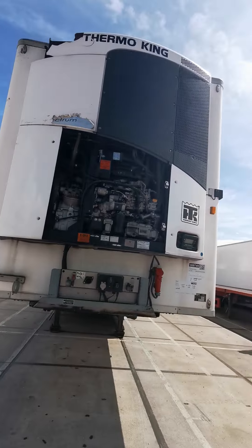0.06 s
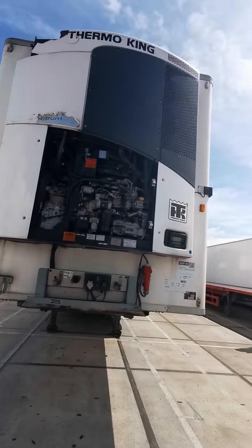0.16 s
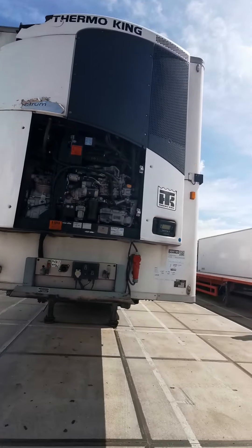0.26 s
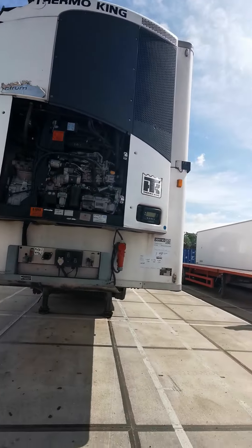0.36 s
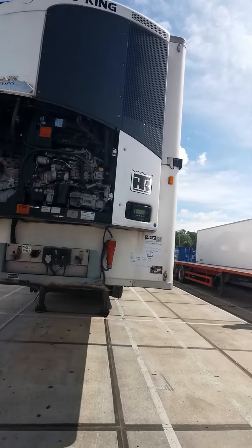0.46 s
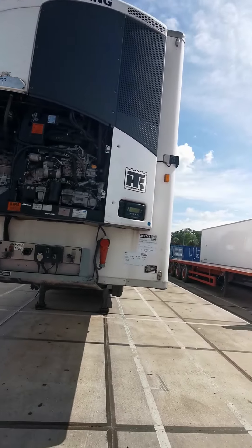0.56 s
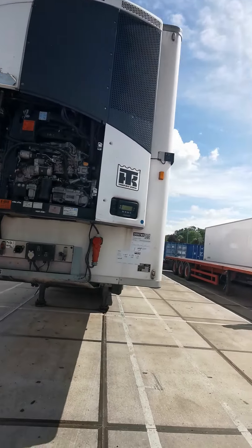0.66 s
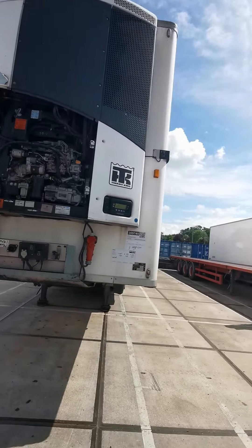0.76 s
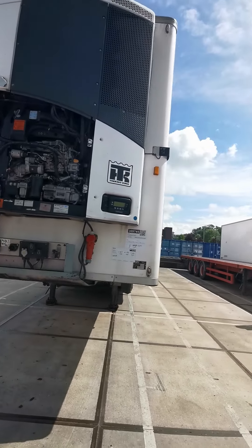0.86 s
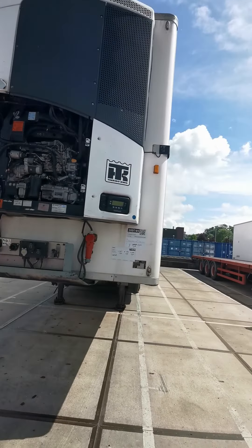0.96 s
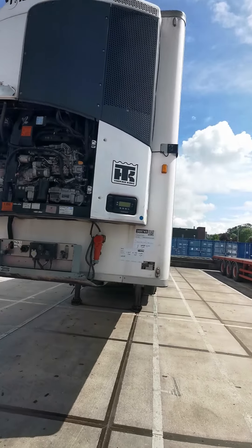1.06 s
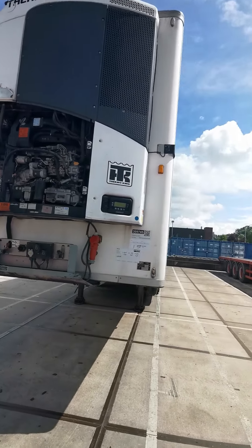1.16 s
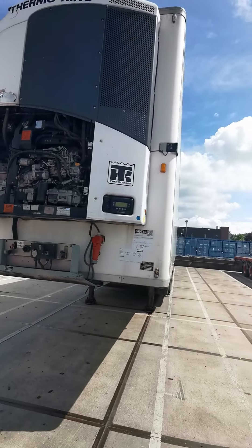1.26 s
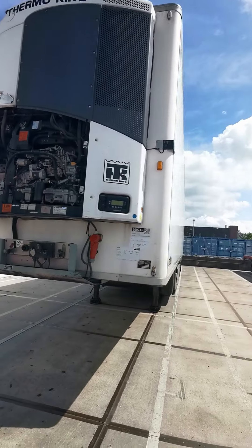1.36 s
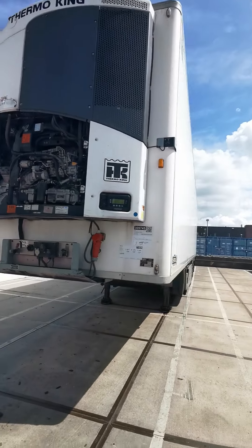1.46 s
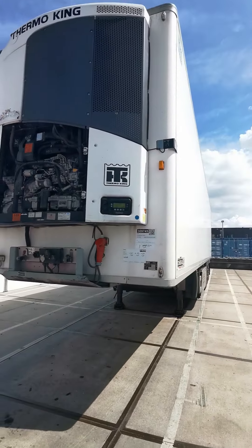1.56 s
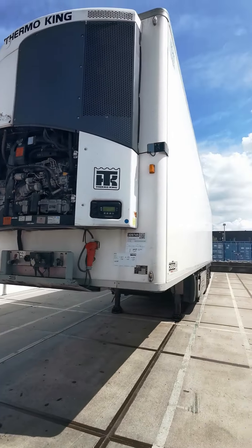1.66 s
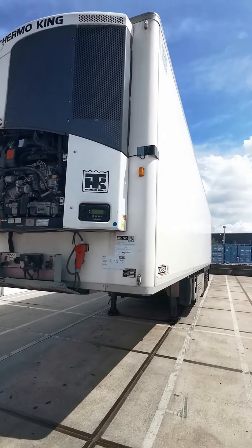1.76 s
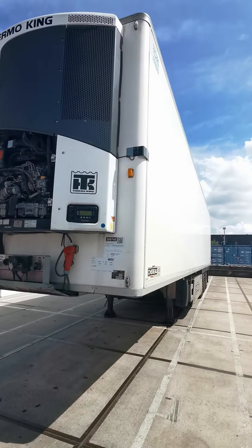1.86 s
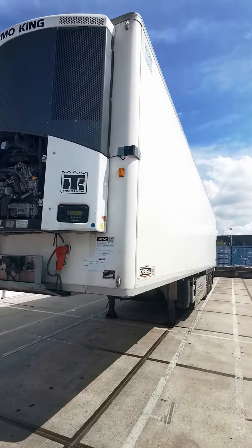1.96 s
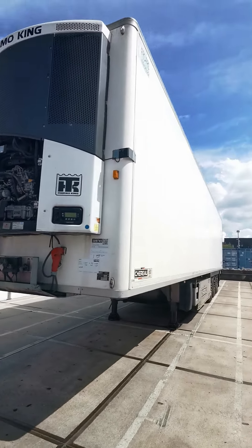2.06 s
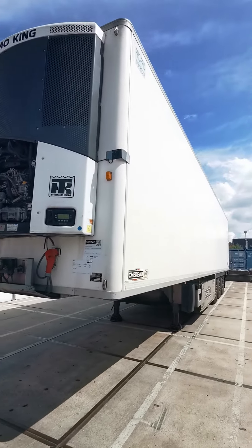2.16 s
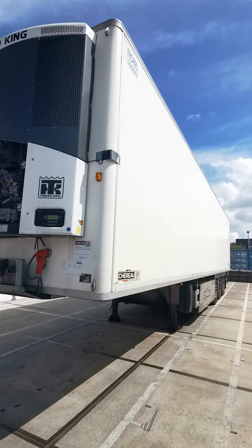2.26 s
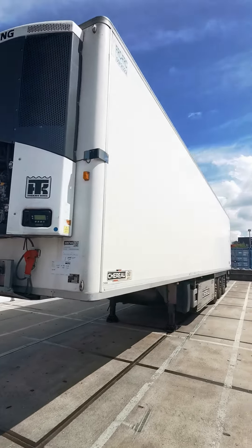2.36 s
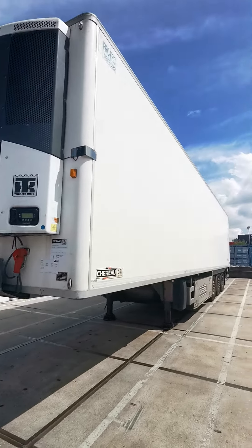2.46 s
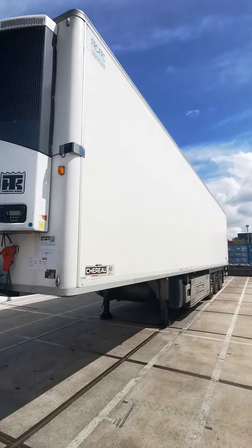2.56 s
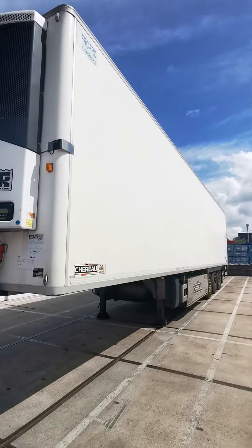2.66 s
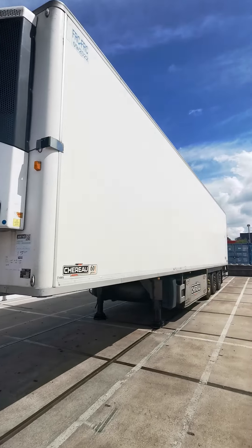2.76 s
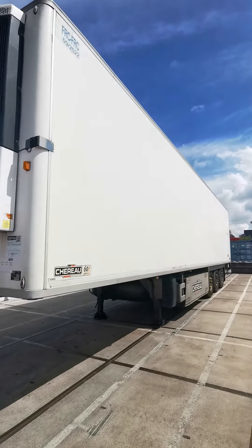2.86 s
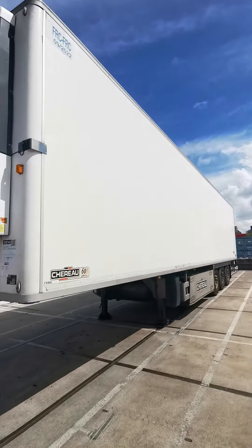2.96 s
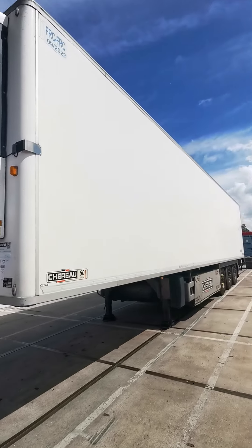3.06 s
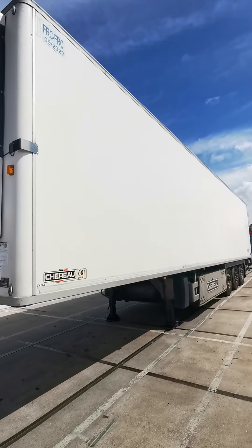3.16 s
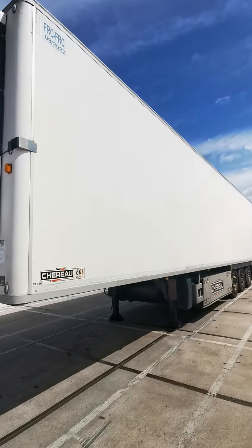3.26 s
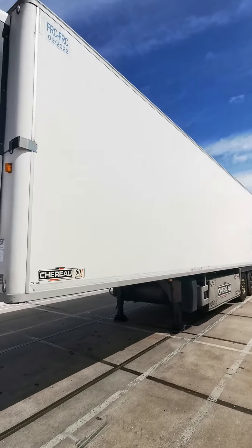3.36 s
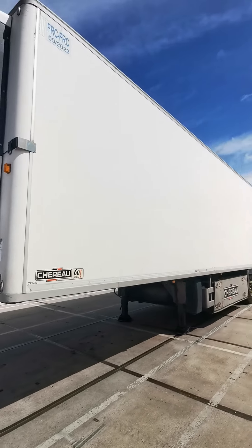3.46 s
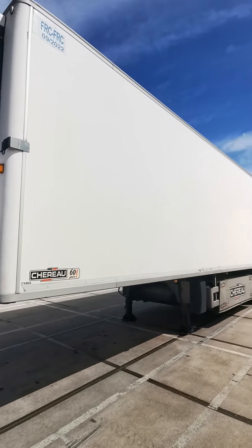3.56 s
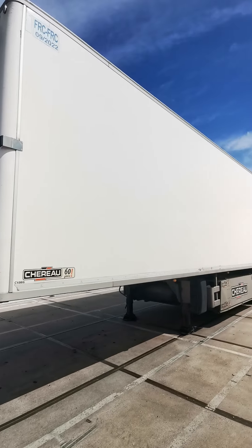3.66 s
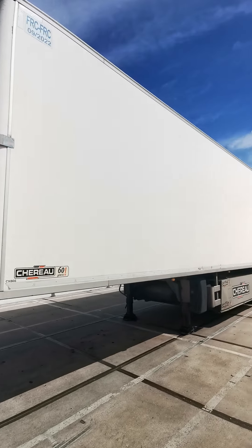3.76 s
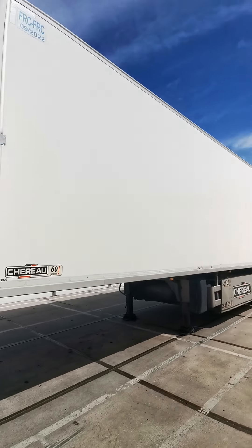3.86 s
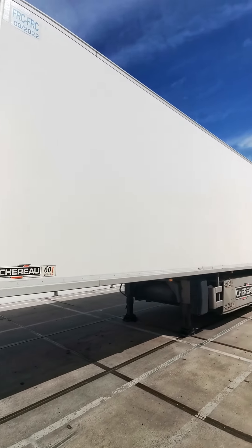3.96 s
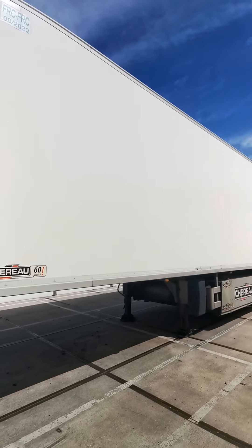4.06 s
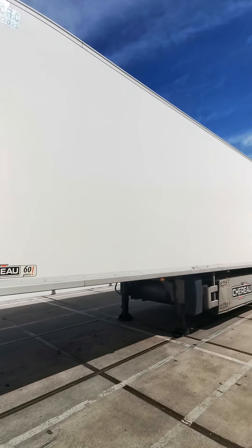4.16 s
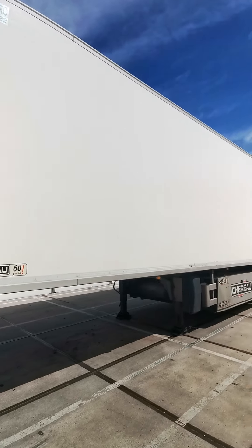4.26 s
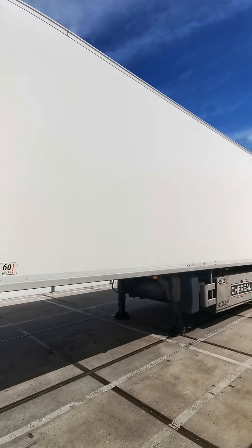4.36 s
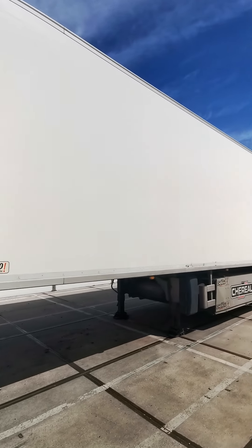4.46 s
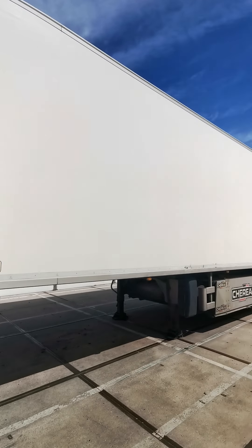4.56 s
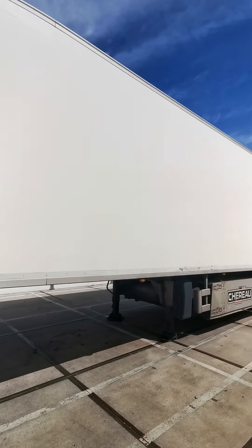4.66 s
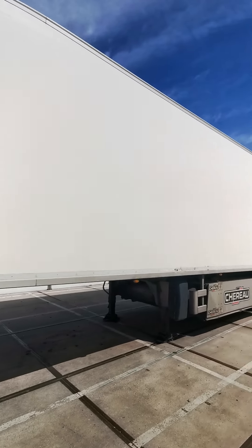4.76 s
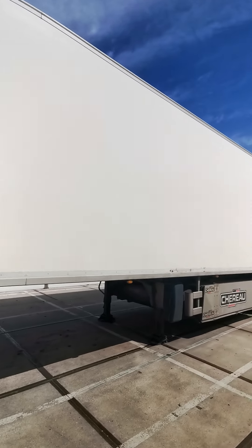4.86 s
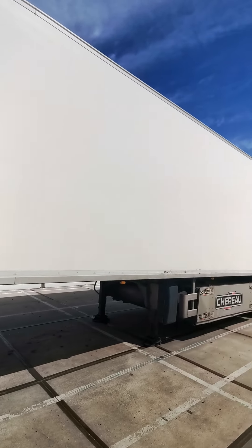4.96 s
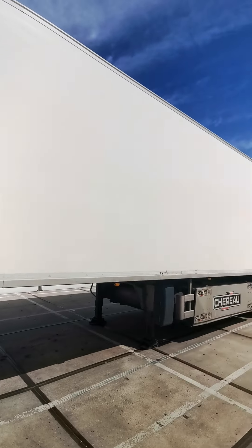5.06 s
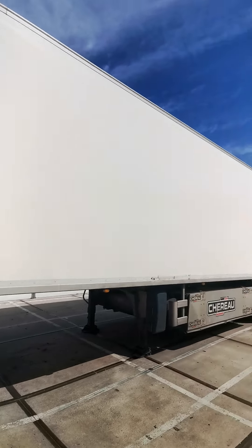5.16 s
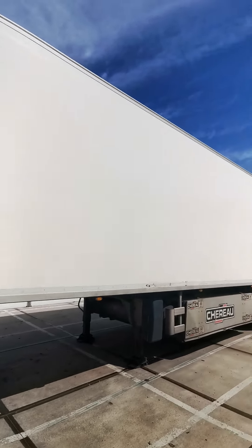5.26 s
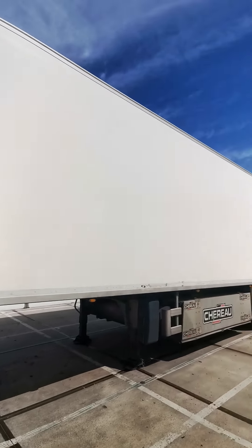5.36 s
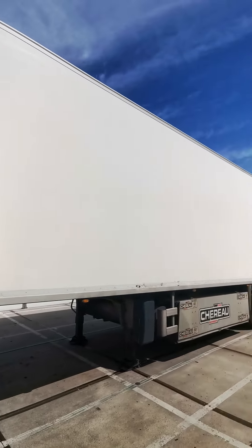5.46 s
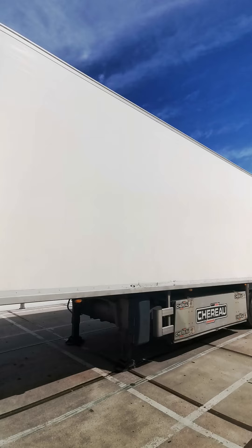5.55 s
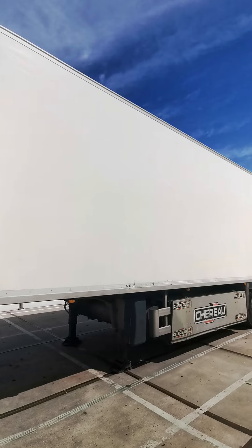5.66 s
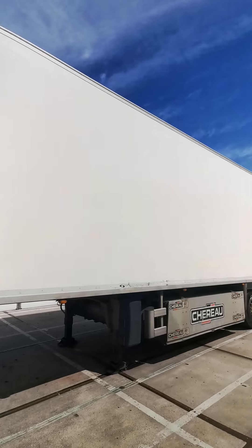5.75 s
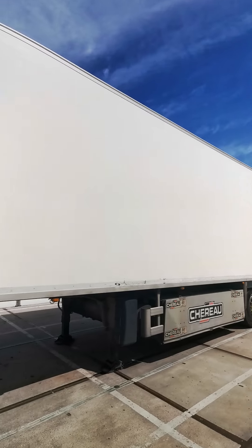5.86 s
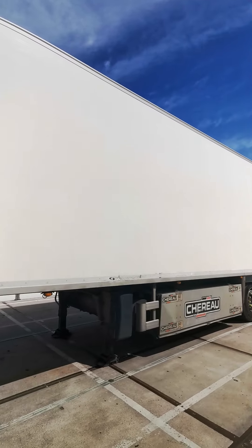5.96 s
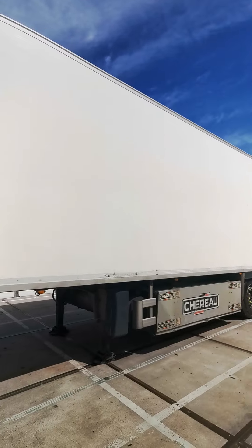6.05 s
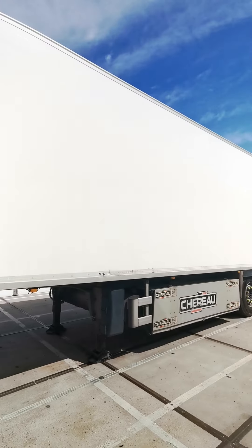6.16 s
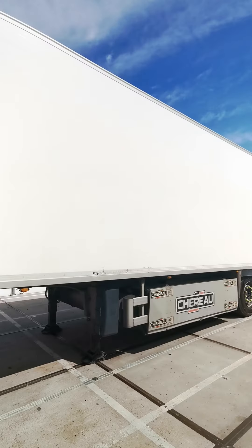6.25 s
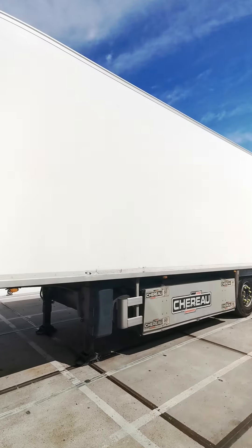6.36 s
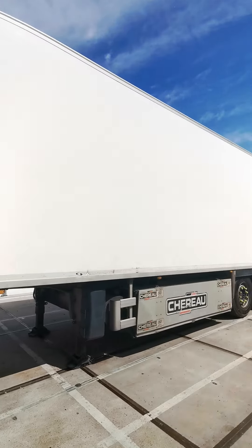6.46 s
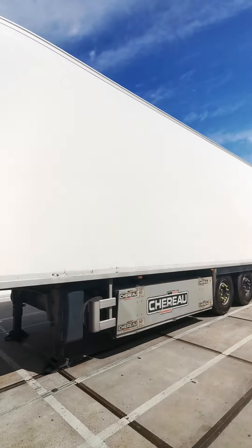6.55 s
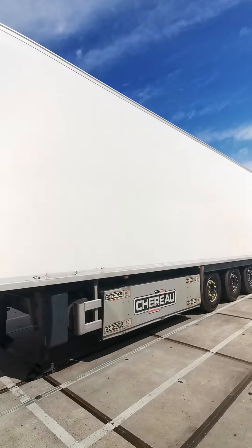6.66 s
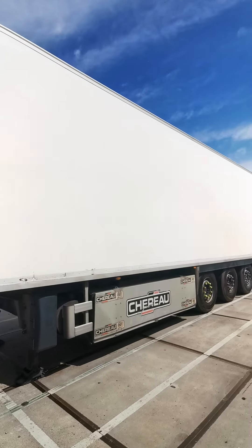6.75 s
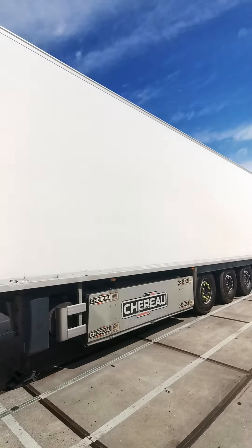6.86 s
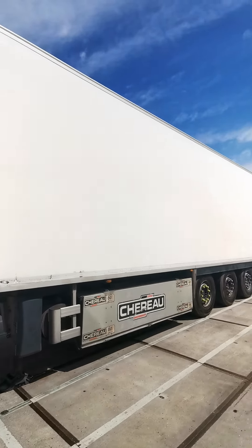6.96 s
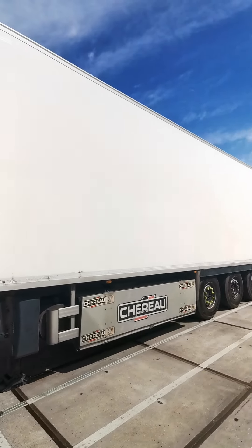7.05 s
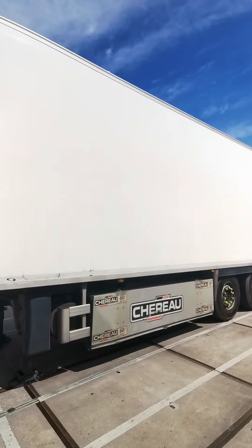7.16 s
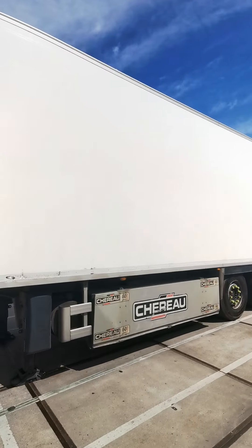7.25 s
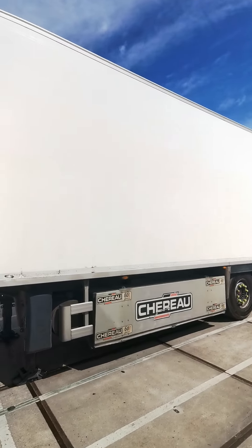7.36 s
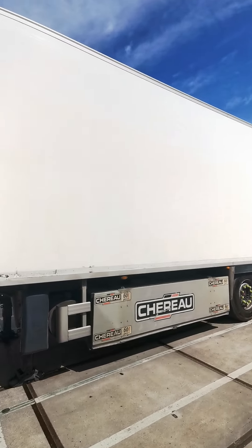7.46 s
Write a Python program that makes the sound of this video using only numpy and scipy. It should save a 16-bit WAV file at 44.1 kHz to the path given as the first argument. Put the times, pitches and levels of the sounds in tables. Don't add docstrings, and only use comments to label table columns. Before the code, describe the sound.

A small diesel cooling unit knocks and hums steadily up close outdoors, then dulls and fades as the listener walks around the corner amid wind buffeting.

```python
import sys
import numpy as np
from scipy import signal
from scipy.fft import rfft, irfft, next_fast_len
from scipy.io import wavfile
from scipy.ndimage import uniform_filter1d

SR = 44100
rng = np.random.default_rng(int(sys.argv[2]) if len(sys.argv) > 2 else 0)


def invert_db(x):
    u = np.asarray(x, float) / 20
    return 10 ** u


def file_out(sig):
    cols = np.atleast_2d(sig).T
    lim = np.clip(cols, -1, 1)
    pcm = np.round(lim * 32767).astype(np.int16)
    wavfile.write(sys.argv[1], SR, pcm)


N = 330309

# [t/s, loss with distance/dB, shade of the corner/dB]
WALK = [(0, 0, -0.5), (.45, -1, 0), (1.1, -2, 0), (1.8, -3, -0.5), (2.2, -3.5, -3.5), (2.4, -5.5, -2.5),
        (2.9, -9.5, 0), (3.3, -9, -1), (3.6, -9, -3.5), (4.2, -11, -4.5), (4.8, -12.5, -7.5),
        (5.25, -16.5, -10), (5.7, -13.5, -12.5), (6.2, -10, -18.5), (6.5, -10.5, -17), (7.09, -12.5, -20),
        (7.49, -12, -18.5)]
REGION_HZ = [200, 750, 2000, 4500]
# [level in front of the unit/dB, share of distance loss, share of shade]
REGIONS = [(-3, -0.38, 0.45), (1.2, 0.026, 0.54), (1.5, -0.16, 0.92), (0.38, 0.36, 0.79)]
# [level in front of the unit/dB, share of distance loss]
TONES = [(-21.5, 0.98), (-18.5, 1.22), (-26.5, 0.54), (-37.5, 0.5)]
# [t/s, f/Hz, depth/dB, length/s]
NULLS = [(.17, 61, 0, 0.22), (.62, 61, 2, .15), (2.08, 61, 14, .07), (2.3, 61, 3, 0.11),
         (4.75, 61, -2, 0.14), (5.16, 61, -1, 0.091), (7.02, 61, -1, .08), (2.1, 121, 2.5, 0.26),
         (4.722, 121, -1, .1), (5.09, 121, 12, .09), (6.1, 121, 4, 0.26), (1.59, 182, 16, 0.44),
         (3.7, 182, -1.5, 0.77), (4.8, 182, 7, 0.25), (6.3, 182, 1.5, 0.26), (1.35, 304, -5.5, 1),
         (3.11, 304, 9, 0.1), (3.85, 304, 11, .25), (4.55, 304, -5.5, .15), (5.2, 304, 5, 0.44),
         (6.55, 304, -5, 0.26)]
PANEL_HIDES_S, PANEL_TURN_S, PANEL_SHADE_DB = 4.95, .22, 16
FACING_S, FACING_SPAN_S, FACING_DB = .65, .6, 6

# [f/Hz, level per Hz/dB]
LEFT_PORT = [(25, -2), (90, 5.5), (240, 9.5), (400, -2.5), (700, -5), (1300, -9.5), (2100, -5.5),
             (2900, -8.5), (4200, -12.5), (6500, -10), (8200, -20), (10500, -27.5), (15500, -34),
             (16500, -60)]
RIGHT_PORT = [(240, 5), (650, 2), (1250, -3.5), (1600, 0.5), (2250, 1.5), (2900, -9.5), (6500, -10.5),
              (7800, -23.5), (10000, -20), (10800, -13.5), (14000, -22.5), (15300, -13), (15750, -21),
              (16000, -60)]
# [f/Hz, left-right likeness, repeating knock over fresh noise/dB]
FIELD = [(100, 0.73, -10.5), (427, 1, -7), (890, 0.54, 5), (2030, 0.53, -2), (2670, 0.17, -11),
         (5000, 0.031, -30), (9000, 0.056, -27)]
RIGHT_LAG_S = 0.00012
# (level/dB, share of distance loss)
LEFT_TURN, RIGHT_TURN = (3.5, .5, 2.5), (7, .75)
OVERLOAD = .85

# [f/Hz, level per Hz/dB]
YARD = [(300, -43), (500, 2.5), (1200, 6), (1700, -11), (2700, -3), (3500, -12.5), (6500, -15), (7600, -48)]
YARD_DB = -45
# [t/s, level/dB, hold/s]
LEFT_GUSTS = [(0, -31, .02), (1.3, -31, .15), (1.65, -33, .15), (2.3, -32, .1), (2.55, -35, .05),
              (3.72, -30, .12), (3.98, -27, .15), (4.25, -32, .2), (4.62, -30, .25), (4.93, -22.5, .14),
              (5.12, -27, .08), (5.55, -28, .2), (5.88, -23, .2), (6.3, -27, .3), (6.68, -25, .18),
              (6.93, -29, .1), (7.15, -29, .1), (7.38, -22, .24)]
RIGHT_GUSTS = [(0, -28, .05), (.7, -35, .5), (1.35, -22, .1), (1.9, -24, .08), (2.05, -21, .06),
               (2.215, -19.5, .12), (4.22, -30, .12), (4.55, -35, .12), (5.5, -30, .06), (5.65, -34, .12),
               (6.3, -34, .3), (6.8, -37, .4), (7.35, -33, .12)]
CALM_DB, GUST_SLOPE_DB_PER_S = [-39, -43], [90, 170]
PORT_BRIGHT_DB = [-20, -1]
# [t/s, level/dB, port (0 left, 1 right)]
POPS = [
    (2.042, -4, 1),
    (2.219, -9, 1),
    (2.238, -6, 1),
    (2.254, -7, 1),
    (5.153, -11, 0),
    (6.131, -15, 0),
    (6.311, -8, 0),
]

# [t/s, peak level/dB, loss of top/dB]
TICKS = [(5.0409, -24, 14), (5.0558, -11.5, 16), (5.2084, -26, -1), (5.217, -8.5, 1.5), (5.903, -13, -3),
         (5.98, -14.5, 5.5), (6.1614, -13, 4), (6.6169, -23, 13), (6.6366, -19.5, 0.5), (6.648, -28, 3),
         (6.7927, -23.5, 22), (6.8264, -28, 5), (6.996, -14, 0.5), (7.0592, -12, 10), (7.1654, -14, 29),
         (7.214, -17, 29), (7.4834, -13, -11)]
# [f/Hz, width/Hz, level/dB]
TICK_MODES = [(2530, 1140, 3.5), (5300, 1730, 3.5), (6690, 790, 2.5), (10580, 1230, -0.5),
              (14450, 4100, -10)]
# [t/s, level/dB, hold/s]
STROKES = [
    (5.08, -38, .03),
    (5.11, -33, .012),
    (5.135, -39, .015),
    (5.2, -48, 0.076),
    (5.28, -44, .06),
    (7.27, -51.5, 0.032),
]
STROKE_SLOPE_DB_PER_S = 950
# [f/Hz, width/Hz, level/dB]
RUB_MODES = [(4500, 2200, 0.5), (6350, 660, 8.5), (10800, 2000, -3.5), (15000, 2000, -8)]

CYCLE = 2905
LOUD_FIRING_S = .0405
CYLINDER_DB = [0.5, 1.5, -7, 0.5]
# [multiple of crank speed, level over third firing tone/dB]
LOW_ORDERS = [(1, -19), (3, -14), (4.5, -7), (5, -12), (7, -15), (8, -8)]
# [multiple of crank speed, level over fifth firing tone/dB]
HIGH_ORDERS = [(12, -7), (13, -16.5), (14, -18), (15, -11.5), (19, -12.5), (20, -15.5), (21, -14),
               (23, -16), (24, -13), (26, -26), (28, -16.5), (30, -23), (32, -24.5), (34, -20.5)]
# [f/Hz, width/Hz, level/dB]
FAN_TONE = [(233, 10, -17)]
# [f/Hz, width/Hz, level/dB]
BLOCK_MODES = [(700, 100, -8), (980, 80, -8), (1600, 110, -1), (1850, 140, 5), (2030, 90, 2),
               (2210, 110, 2), (2500, 250, -8)]
# [f/Hz, width/Hz, level over the other cylinders/dB]
WHINES = [(1564, 12, -22), (2020, 10, -22), (2188, 12, -22)]
# [f/Hz, width/Hz, level/dB]
COVER_MODES = [(3510, 640, -5.5), (4340, 520, -5)]
KNOCK_DB, LOUD_OVER_DB = -24, 9.5
RATTLE_DB, RATTLE_FROM_S, RATTLE_TO_S = -40, 1.96, 3.53
RATTLE_RISE_DB_PER_S, RATTLE_FALL_DB_PER_S = 17, 4.5


def rms_one(x):
    return x / np.sqrt(np.mean(x ** 2) + 1e-20)


def in_time(rows):
    s, *columns = np.transpose(rows)
    return np.array([np.interp(np.arange(N) / SR, s, column) for column in columns])


def at_hz(hz, points, axis=1):
    points = np.array(points)
    return np.interp(np.log(hz + 1), np.log(points[:, 0]), points[:, axis])


def drift(rate):
    r = np.exp(-80 * np.pi * rate / SR)
    slow = signal.lfilter([1], [1, -2 * r, r * r], rng.standard_normal(N // 40 + 2002))[2000:]
    return np.interp(np.arange(N) / 40, np.arange(len(slow)), rms_one(slow - slow.mean()))


def resonate(x, modes):
    out = 0
    for k, (hz, width, db) in enumerate(modes):
        r = np.exp(-np.pi * width / SR)
        b = (1 - r * r) / 2 * np.array([1, 0, -1])
        a = [1, -2 * r * np.cos(2 * np.pi * hz / SR), r * r]
        out = out + (-1) ** k * invert_db(db) * signal.lfilter(b, a, x)
    return out


def unsteady_tone(mode):
    return rms_one(resonate(resonate(rng.standard_normal(N), [mode]), [mode]))


def bandpass(x, order, low_hz, high_hz):
    return signal.sosfilt(signal.butter(order, [low_hz, high_hz], "band", fs=SR, output="sos"), x)


def swells(rows, slope_db, calm_db):
    t = np.arange(0, N + 64, 64) / SR
    s, db, hold = np.transpose(rows)[:, :, None]
    outside = np.maximum(np.abs(t - s) - np.abs(hold) / 2, 0)
    power = invert_db(2 * (db - slope_db * outside)).sum(axis=0)
    return np.interp(np.arange(N) / SR, t, 10 * np.log10(power + invert_db(2 * calm_db)))


def hidden():
    return .5 + .5 * np.tanh((np.arange(N) / SR - PANEL_HIDES_S) / PANEL_TURN_S / 2)


def yard(left_db=-3.5):
    size = next_fast_len(N)
    colour = invert_db(at_hz(np.arange(size // 2 + 1) * SR / size, YARD))
    noise = rms_one(irfft(rfft(rng.standard_normal((2, size))) * colour, size)[:, :N])
    return invert_db(YARD_DB + np.array([[left_db], [-left_db]])) * noise


def wind(lumpy_db=2.5, bright_from_db=-17.5):
    pops = np.zeros((2, N))
    for s, pop_db, port in POPS:
        pops[round(port), round(s * SR)] = -invert_db(pop_db + 29.0)
    out = bandpass(pops, 3, 90, 560)
    for port, gusts in enumerate([LEFT_GUSTS, RIGHT_GUSTS]):
        port_db = swells(gusts, GUST_SLOPE_DB_PER_S[port], CALM_DB[port])
        lumps = rng.standard_normal((2, N)) * invert_db(lumpy_db * np.tanh(drift(8.9)))
        low = rms_one(bandpass(lumps[0], 2, 22, 190))
        high = rms_one(bandpass(lumps[1], 2, 160, 520))
        bright = invert_db(1.1 * (port_db - bright_from_db) + PORT_BRIGHT_DB[port])
        out[port] += invert_db(port_db + 1.0) * (low + bright * high)
    return out


def hand(left_db=-55.0):
    whole, top = np.full(N, 1e-18), np.full(N, 1e-18)
    for s, peak_db, loss_db in TICKS:
        at = round((s + 0.00114) * SR)
        whole[at] = invert_db(peak_db + 14.5)
        top[at] = whole[at] * invert_db(-loss_db)
    low, high = [signal.butter(2, 8500, kind, fs=SR, output="sos") for kind in ("low", "high")]
    ticks = resonate(signal.sosfilt(low, whole) - signal.sosfilt(high, top), TICK_MODES)
    rub_db = swells(STROKES, STROKE_SLOPE_DB_PER_S, -88) + 1.2 * drift(90)
    rub = invert_db(rub_db) * rms_one(resonate(rng.standard_normal(N), RUB_MODES))
    right = signal.sosfilt(signal.butter(8, 15900, fs=SR, output="sos"), 1.5 * rub - ticks)
    return right * invert_db(np.array([[left_db], [0]]))


def firing_gate(floor=1.0, knock_s=0.0019, rise_s=0.0022, valve_s=0.0057, valve_db=-5.5):
    since = (np.arange(N) - LOUD_FIRING_S * SR) % CYCLE / (CYCLE / 4)
    strength = invert_db(np.array(CYLINDER_DB))[since.astype(int) % 4]
    age = since % 1 * CYCLE / 4 / SR
    valve = invert_db(valve_db) * (age > valve_s) * np.exp(-np.abs(age - valve_s) / knock_s)
    flare = uniform_filter1d(strength * (np.exp(-age / knock_s) + valve), round(rise_s * SR))
    return rms_one(floor + flare)


def rattle(left_db=-4.5):
    bursts = firing_gate(floor=0.28) * rng.standard_normal((2, N))
    t = np.arange(N) / SR
    rise_db = RATTLE_RISE_DB_PER_S * np.clip(RATTLE_FROM_S - t, 0, 1)
    fall_db = RATTLE_FALL_DB_PER_S * np.maximum(t - RATTLE_TO_S, 0)
    level_db = RATTLE_DB - rise_db - fall_db - 0.49 * PANEL_SHADE_DB * hidden()
    return invert_db(level_db + np.array([[left_db], [0]])) * rms_one(resonate(bursts, COVER_MODES))


def firing_tones():
    t, loss_db = np.arange(N) / SR, in_time(WALK)[0]
    levels = np.array([db + share * loss_db for db, share in TONES])
    for s, hz, depth_db, length in NULLS:
        tone = np.argmin(np.abs(hz * CYCLE / SR / 4 - np.array([1, 2, 3, 5])))
        levels[tone] -= depth_db * np.exp(-((t - s) / length) ** 2)
    return levels


def hum(wobble_db=2.5, wander=0.063, left_db=1.5):
    first_db, second_db, third_db, fifth_db = firing_tones()
    orders = [(2, first_db), (4, second_db), (6, third_db), (10, fifth_db)]
    orders += [(k, third_db + db) for k, db in LOW_ORDERS]
    orders += [(k, fifth_db + db + wobble_db * drift(0.55)) for k, db in HIGH_ORDERS]
    crank = 4 * np.pi * np.arange(N) / CYCLE + wander * drift(1.3)
    out = np.zeros(N)
    for k, db in orders:
        out += np.sqrt(2) * invert_db(db) * np.sin(k * crank + rng.uniform(0, 2 * np.pi))
    for mode in FAN_TONE:
        out += invert_db(mode[2] + uniform_filter1d(first_db, SR) + 5.0) * unsteady_tone(mode)
    ports = np.array([out, np.roll(out, round(RIGHT_LAG_S * SR))])
    return ports * invert_db(np.array([[left_db], [-left_db]]))


def repeating(per_turn=0.72, per_cycle=1.04, count=3):
    place, out = np.arange(N) % CYCLE, 0
    for _ in range(count):
        firing, turn, cycle = rng.standard_normal((3, CYCLE))
        pattern = sum(np.roll(firing, k * CYCLE // 4) for k in range(4)) / 2
        pattern = pattern + per_turn * (turn + np.roll(turn, CYCLE // 2)) + per_cycle * cycle
        out = out + pattern[place] * drift(0.38)
    return rms_one(out)


def block(patchy_db=0.5, count=17):
    size = next_fast_len(N)
    hz = np.arange(size // 2 + 1) * SR / size
    gate, share = firing_gate(), invert_db(at_hz(hz, FIELD, axis=2))

    def gated():
        fresh = rfft(gate * rng.standard_normal(N), size)
        return fresh + share * rfft(gate * repeating(), size)

    near, other = gated(), gated()
    alike = np.clip(at_hz(hz, FIELD), 0, 1)
    lagged = near * np.exp(-2j * np.pi * hz * RIGHT_LAG_S)
    right = alike * lagged + np.sqrt(1 - alike ** 2) * other
    colour = invert_db(np.array([at_hz(hz, LEFT_PORT), at_hz(hz, RIGHT_PORT)]))
    colour[1] *= hz ** 2 / (hz ** 2 + 42.0 ** 2)
    ports = np.array([near, right]) * colour / np.sqrt(1 + share ** 2)

    loss_db, shade_db = in_time(WALK)
    walk_db = np.array([db + far * loss_db + shaded * shade_db for db, far, shaded in REGIONS])
    left_turn_db = LEFT_TURN[0] + LEFT_TURN[1] * loss_db + LEFT_TURN[2] * hidden()
    right_turn_db = (RIGHT_TURN[0] + RIGHT_TURN[1] * loss_db) * hidden()
    turn_db = np.array([left_turn_db, right_turn_db])
    centres, out = np.geomspace(40, 16000, count), 0
    for k, centre in enumerate(centres):
        band = np.interp(np.log(hz + 1), np.log(centres), np.arange(count) == k)
        mix = [np.interp(np.log(centre), np.log(REGION_HZ), row) for row in np.eye(4)]
        mix[3] *= 1 + .55 * max(np.log2(centre / 11000), 0)
        level_db = mix @ walk_db + (0.47 * mix[1] + mix[2]) * turn_db + patchy_db * drift(14.0)
        out = out + irfft(ports * band, size)[:, :N] * invert_db(level_db)
    return invert_db(-16.5) * out


def knock(spread_db=1.2, jitter_s=.00003, slap_s=.00325, left_db=-9.0):
    firing = np.arange(-2, N * 4 // CYCLE - 3)
    chance = rng.standard_normal((len(firing), 2))
    at = LOUD_FIRING_S * SR + firing * CYCLE / 4 + jitter_s * SR * chance[:, 0]
    at = np.round(at).astype(int)
    others_db = KNOCK_DB - PANEL_SHADE_DB * hidden()
    facing_db = FACING_DB * np.exp(-((np.arange(N) / SR - FACING_S) / FACING_SPAN_S) ** 2)
    loud_db = others_db + facing_db + LOUD_OVER_DB * (1 - .7 * hidden())
    blow_db = np.where(firing % 4 == 0, loud_db[at], others_db[at])
    blows = np.full(N, 1e-18)
    blows[at] = invert_db(blow_db + spread_db * chance[:, 1] + 23.0)
    rung = resonate(blows + .55 * np.roll(blows, round(slap_s * SR)), BLOCK_MODES)
    for mode in WHINES:
        rung += invert_db(mode[2] + others_db + 1.5) * unsteady_tone(mode)
    left = invert_db(left_db - 3.0 + .4 * in_time(WALK)[0]) * rung
    return np.array([left, np.roll(rung, round(RIGHT_LAG_S * SR))])


def scene():
    return yard() + wind() + hand() + rattle() + hum() + block() + knock()


def low_pass(x):
    return signal.sosfilt(signal.butter(12, 17110, fs=SR, output="sos"), x)


def record(dry):
    edge = np.abs(signal.lfilter([1, -1], [1], dry)).max(axis=0)
    over_db = np.maximum(20 * np.log10(edge + 1e-9) + 14.1, 0)
    ramp = 61.0 * np.arange(N) / SR
    held_db = np.maximum.accumulate(over_db + ramp) - ramp
    duck_db = signal.lfilter([.012], [1, -.988], held_db)
    mix = np.clip(dry * invert_db(-.8 * duck_db), -OVERLOAD, OVERLOAD)
    return low_pass(mix)


dry = scene()
out = record(dry)
file_out(out)
```